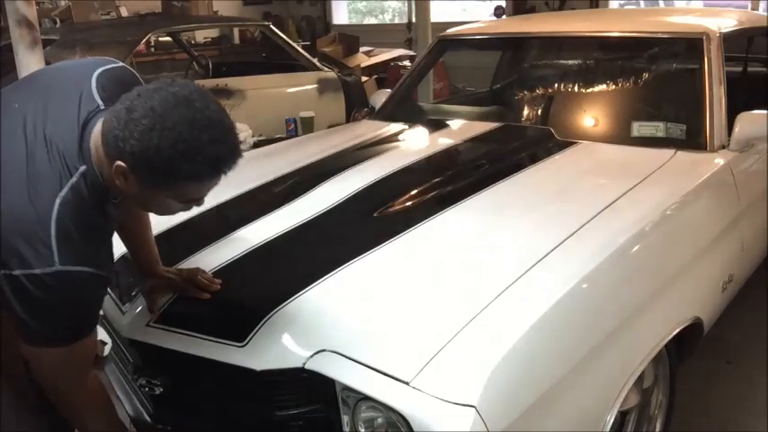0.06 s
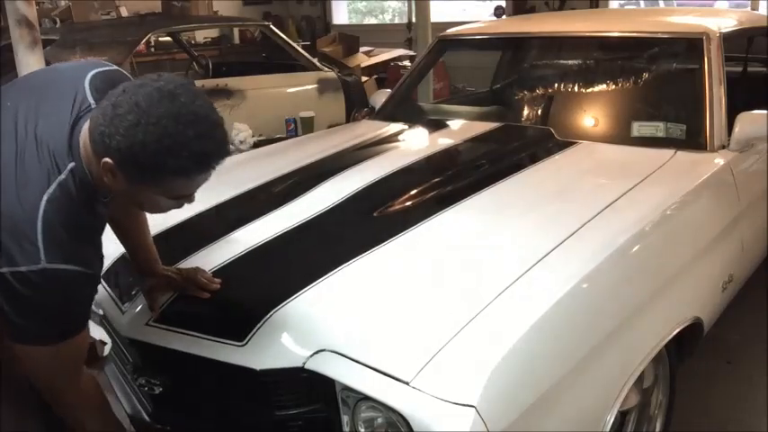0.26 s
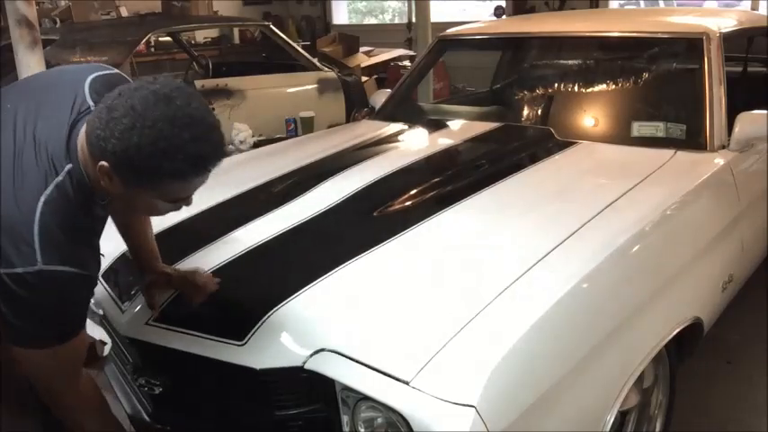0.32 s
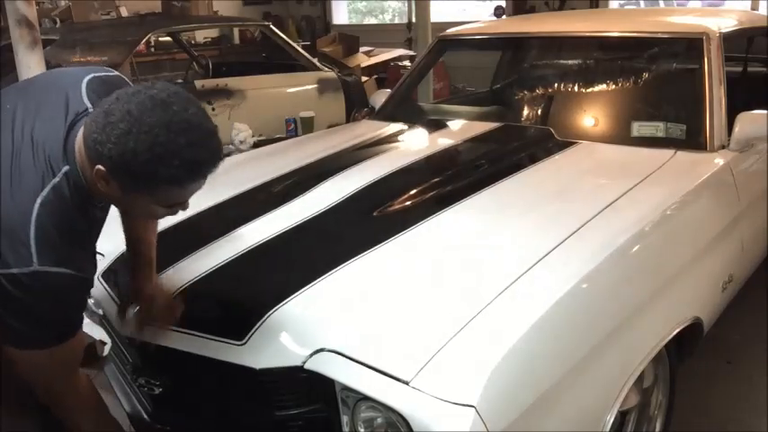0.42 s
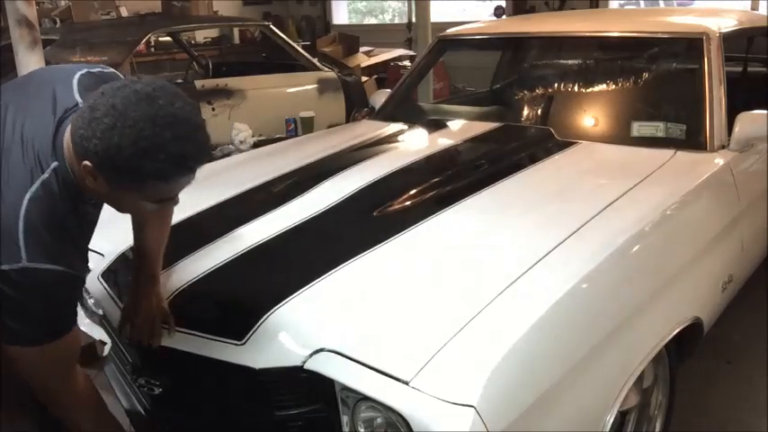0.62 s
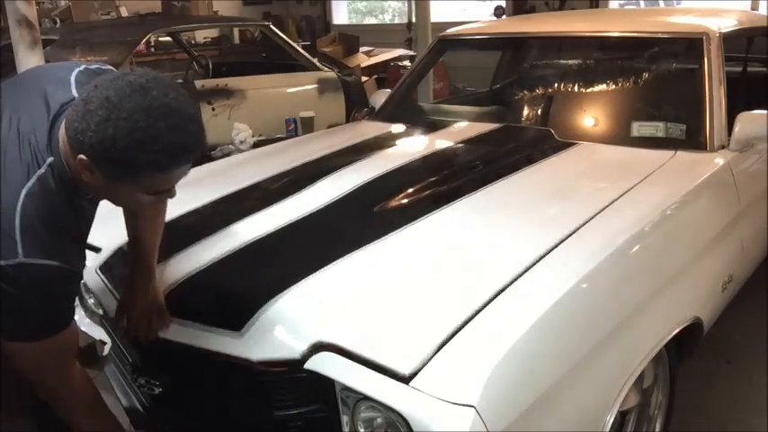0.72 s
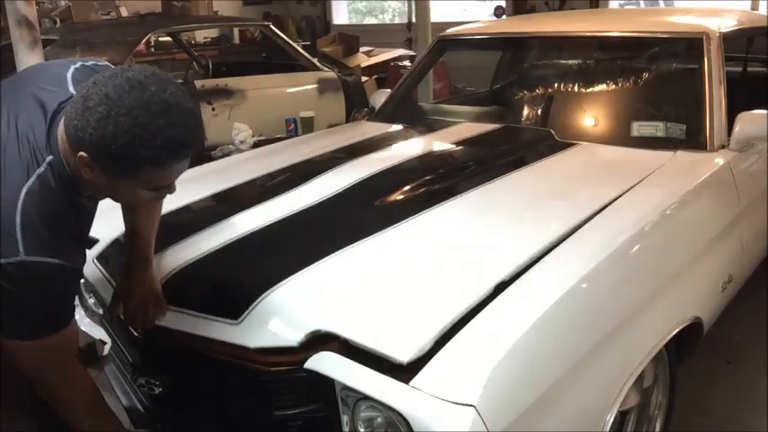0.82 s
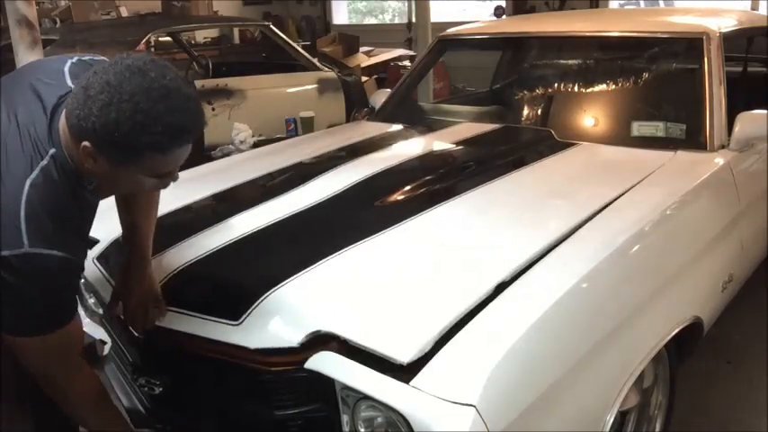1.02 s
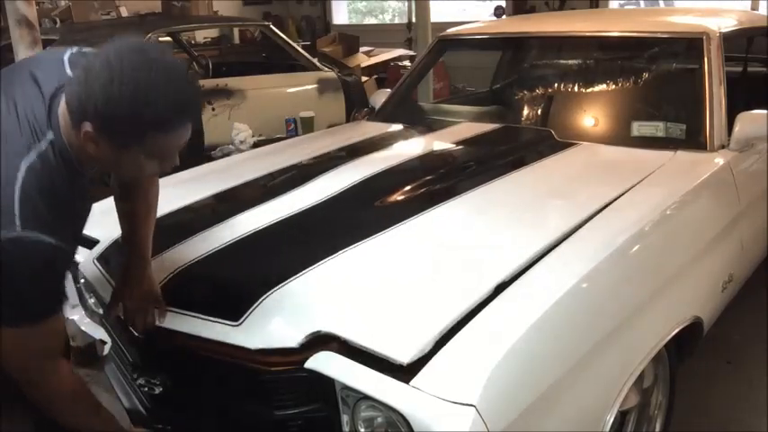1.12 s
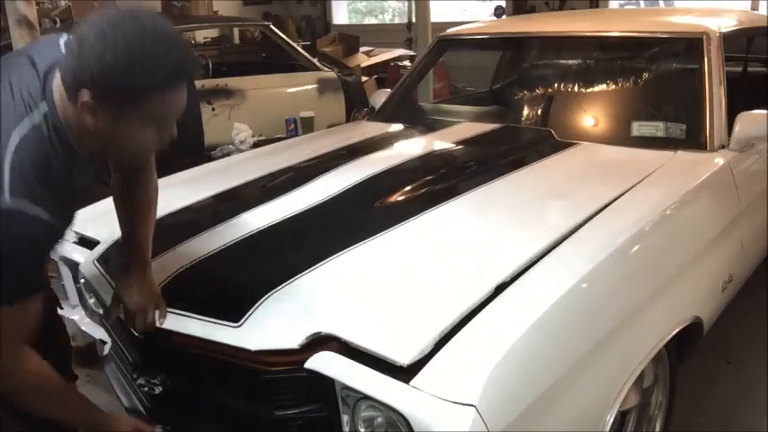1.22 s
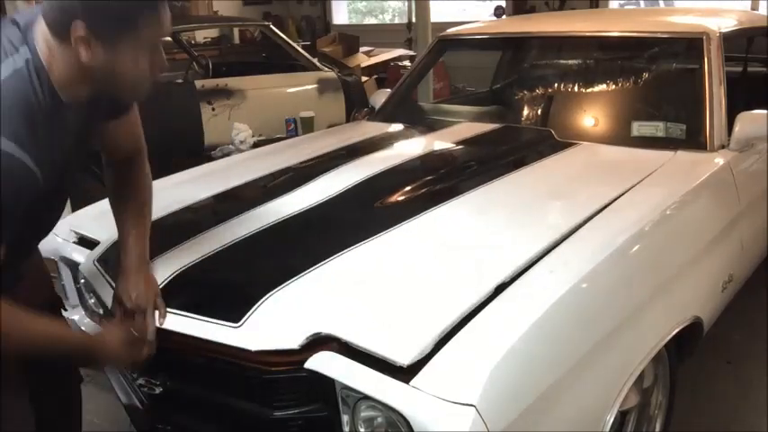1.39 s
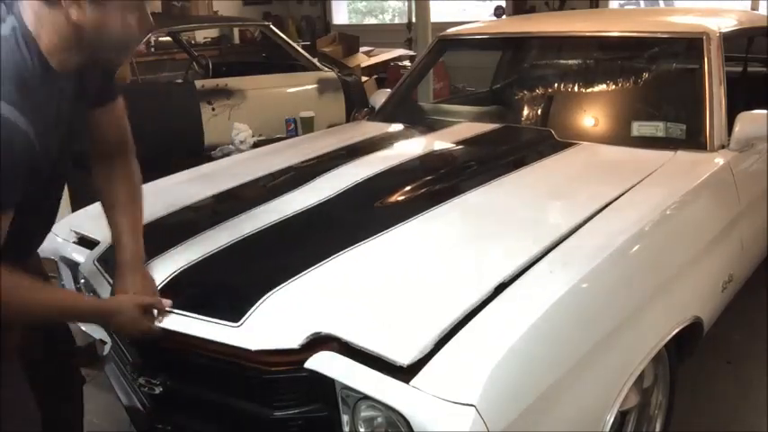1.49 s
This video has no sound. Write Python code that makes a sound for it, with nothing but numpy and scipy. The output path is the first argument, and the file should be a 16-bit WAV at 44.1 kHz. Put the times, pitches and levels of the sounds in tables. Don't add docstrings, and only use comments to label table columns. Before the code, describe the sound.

A car hood latch squeals briefly and snaps open with a loud metal clunk, the panel booming; after a quiet gap come a dull thud, light clicks and a sharp clank, close microphone in a quiet garage.

```python
import sys
import numpy as np
from scipy import signal
from scipy.fft import rfft, irfft, next_fast_len
from scipy.io import wavfile
from scipy.ndimage import map_coordinates

SR = 44100
rng = np.random.default_rng(int(sys.argv[2]) if len(sys.argv) > 2 else 0)


def rack_gain(trim_db):
    fader = np.asarray(trim_db, float)
    return 10 ** (fader / 20)


def transcribe(signal):
    frames = np.atleast_2d(signal).T
    limited = np.clip(frames, -1, 1)
    pcm = np.round(limited * 32767).astype(np.int16)
    wavfile.write(sys.argv[1], SR, pcm)


N = 68355


def unit(x):
    return x / np.sqrt(np.mean(x ** 2) + 1e-20)


def along(points, hz):
    point_hz, value = np.transpose(points)
    return np.interp(np.log(hz + 1), np.log(point_hz + 1), value)


def coloured(x, points):
    m = 2 * next_fast_len(len(x) // 2 + SR // 10)
    gain = rack_gain(along(points, np.fft.rfftfreq(m, 1 / SR)))
    cepstrum = irfft(np.log(gain + 1e-5), m)
    cepstrum[1:m // 2] *= 2
    cepstrum[m // 2 + 1:] = 0
    return irfft(rfft(x, m) * np.exp(rfft(cepstrum)), m)[:len(x)]


def evened(x):
    hz = np.fft.rfftfreq(len(x), 1 / SR)
    centre_hz = np.geomspace(50, 20000, 36)
    near = np.exp(-(np.log((hz + 1) / centre_hz[:, None]) / .12) ** 2)
    power = near @ abs(rfft(x)) ** 2 / near.sum(axis=1)
    return coloured(x, np.c_[centre_hz, -10 * np.log10(power)])


def tail(decays, scale, size):
    hz, t, z = signal.stft(rng.standard_normal(size), SR, nperseg=128)
    z = z * rack_gain(-60 * t / (scale * along(decays, hz)[:, None]))
    x = signal.istft(z, SR, nperseg=128)[1][:size]
    return x / np.linalg.norm(x)


def swell(t, rise_s, t60_s):
    rise = np.sin(np.pi / 2 * np.clip(t / rise_s, 0, 1)) ** 2
    return rise * rack_gain(-60 * np.maximum(t - rise_s, 0) / t60_s)


def add(out, x, start_s):
    part = out[round(start_s * SR):][:len(x)]
    part += x[:len(part)]


def floor():
    # frequency in Hz, level in dB per Hz.
    hiss_tone = [(25, -22), (60, 1), (170, -8), (250, -5), (640, -4), (1250, -7), (3000, -13), (7000, -17),
                 (16000, -25)]
    # frequency in Hz, level in dB.
    hum_tones = [(62, -83), (320, -80), (638, -83), (1275, -90)]
    t = np.arange(N) / SR
    out = rack_gain(-70) * unit(coloured(rng.standard_normal(N), hiss_tone))
    for hz, db in hum_tones:
        wander_db = 3.5 * map_coordinates(rng.standard_normal(size=30), [t * 9])
        out += rack_gain(db + 3 + wander_db) * np.sin(2 * np.pi * hz * t)
    return out


def contact(out, event, tone, modes=(), ring_db=0):
    # frequency in Hz, t60 in s.
    sheet = [(150, .45), (400, .36), (1000, .3), (2500, .28), (6000, .25), (15000, .2)]
    # frequency in Hz, gain in dB.
    crack = [(300, -20), (1500, -10), (4000, 0), (15000, 2)]
    impacts_per_s, early_scale, phase_walk_rad = 1800, .12, .013
    start_s, db, rise_s, fall_s, t60_scale = event
    t = np.arange(SR // 2) / SR

    impact = rng.random(len(t)) < impacts_per_s / SR
    size = rng.standard_normal(len(t))
    chatter = (.25 + impact * 2.5) * size * swell(t, rise_s, 7 * fall_s)
    body = tail(sheet, t60_scale, len(t)) + coloured(tail(sheet, early_scale, len(t)), crack)
    sound = coloured(evened(signal.fftconvolve(chatter, body)[:len(t)]), tone)
    sound = sound / np.linalg.norm(sound)
    if modes:
        ring = np.zeros(len(t))
        for hz, mode_db, t60_s in modes:
            walk = phase_walk_rad * np.cumsum(rng.standard_normal(len(t)))
            ring += rack_gain(mode_db) * swell(t, rise_s + fall_s, t60_s) * np.sin(2 * np.pi * hz * t + walk)
        sound = sound + rack_gain(ring_db) * ring / np.linalg.norm(ring)
    add(out, rack_gain(db + 31) * sound, start_s)


def scrapes():
    # start in s, level in dB, chatter rise in s, chatter fall in s, sheet t60 scale.
    touch = (.066, -60, .012, .02, .8)
    slide = (.175, -62, .035, .015, .6)
    creep = (.215, -49, .017, .004, .4)
    reach = (1.0, -66, .025, .006, .5)
    lean = (1.215, -50, .003, .003, .7)
    # frequency in Hz, level in dB per Hz.
    touch_tone = [(50, -15), (120, 0), (500, -5), (1200, -13), (1600, -9), (2200, -22), (13200, -70)]
    scrape_tone = [(100, -20), (400, -3), (2000, 0), (5300, -5), (8000, -8), (9500, -22), (15500, -30)]
    out = np.zeros(N)
    contact(out, touch, touch_tone)
    for event in (slide, creep, reach, lean):
        contact(out, event, scrape_tone)
    return out


def panel_booms():
    # start in s, frequency in Hz, level in dB, swell in s, t60 in s.
    booms = [(.073, 75, -53, .018, .27), (.11, 136, -66, .02, .4), (.235, 70, -53, .015, .5),
             (.25, 172, -52, .03, .4), (.37, 320, -59, .03, .25), (.44, 318, -64, .02, .2),
             (.485, 335, -58, .012, .07), (.232, 490, -47, .015, .2), (.24, 235, -51, .015, .2),
             (.275, 680, -48, .012, .15), (.33, 165, -55, .02, .25), (.44, 600, -66, .008, .1),
             (.8, 72, -47, .045, .35), (.83, 146, -50, .03, .3), (.845, 281, -45, .03, .2),
             (.92, 285, -56, .03, .35), (.87, 150, -50, .025, .3), (.8, 200, -55, .02, .2),
             (1.095, 220, -62, .02, .15), (1.095, 420, -56, .015, .15), (1.18, 250, -50, .02, .2),
             (1.265, 160, -52, .02, .2), (1.35, 180, -58, .02, .15), (1.38, 275, -67, .03, .3),
             (.98, 130, -60, .03, .3), (1.01, 60, -59, .02, .2), (.82, 325, -51, .03, .25),
             (.81, 450, -53, .03, .2), (.92, 72, -54, .03, .3), (1.04, 72, -58, .03, .3),
             (1.178, 390, -43, .022, .2), (1.19, 60, -49, .04, .35), (1.2, 272, -48, .04, .4),
             (1.22, 410, -48, .015, .2), (1.23, 130, -52, .03, .4), (1.31, 152, -53, .02, .25),
             (1.365, 61, -50, .02, .3), (1.29, 350, -56, .03, .2), (1.51, 65, -63, .02, .3)]
    drift_rad, gain_db = .6, 2.5
    out, t = np.zeros(N), np.arange(SR // 2) / SR
    for start_s, hz, db, rise_s, t60_s in booms:
        drift = drift_rad * map_coordinates(rng.standard_normal(size=40), [t * 45])
        boom = swell(t, rise_s, t60_s) * np.sin(2 * np.pi * hz * t + drift)
        add(out, rack_gain(db + gain_db) * boom, start_s)
    return out


def garage(hood):
    # frequency in Hz, t60 in s.
    room_decay = [(80, 1.3), (500, 1.1), (2000, .8), (6000, .45), (15000, .3)]
    level_db, delay_s = -27, .02
    delayed = np.pad(hood, (round(delay_s * SR), 0))
    return rack_gain(level_db) * signal.fftconvolve(delayed, tail(room_decay, 1, SR))[:N]


def panel_flexes():
    # start in s, level in dB, chatter rise in s, chatter fall in s, sheet t60 scale.
    press = (.13, -63, .05, .03, .6)
    shift = (.4, -63, .05, .03, .6)
    settle = (.79, -46, .06, .022, .85)
    lift = (.96, -60, .05, .05, .7)
    heave = (1.17, -42.5, .04, .035, .7)
    # frequency in Hz, level in dB per Hz.
    panel_tone = [(35, -28), (70, -3), (150, -3), (300, 0), (450, -3), (650, -9), (1200, -16), (3000, -36),
                  (15500, -80)]
    out = np.zeros(N)
    for event in (press, shift, settle, lift, heave):
        contact(out, event, panel_tone)
    return out


def squeal():
    # start in s, rise in s, level in dB, t60 in s.
    squeal_event = (.221, .015, -35, .05)
    # frequency in Hz, level in dB.
    squeal_parts = [(2530, 0), (4200, -8), (5350, -4), (7920, -10)]
    start_s, rise_s, db, t60_s = squeal_event
    out, t = np.zeros(N), np.arange(SR // 10) / SR
    walk = .02 * np.cumsum(rng.standard_normal(len(t)))
    voice = sum(rack_gain(part_db) * np.sin(2 * np.pi * hz * t + walk) for hz, part_db in squeal_parts)
    add(out, rack_gain(db) * voice * swell(t, rise_s, t60_s) * np.clip(t / rise_s, 0, 1), start_s)
    return out


def latch_hits():
    # start in s, level in dB, chatter rise in s, chatter fall in s, sheet t60 scale.
    snap = (.2295, -29.4, .006, .009, 1.13)
    rebound = (.255, -37, .012, .008, .95)
    stop = (.821, -48.5, .007, .008, .85)
    click = (1.023, -46.5, .013, .004, .55)
    hook = (1.098, -40, .007, .005, 1.05)
    clank = (1.171, -32.5, .003, .005, 1.05)
    # frequency in Hz, level in dB per Hz.
    snap_tone = [(40, -24), (150, -11), (420, -2), (570, -8), (1500, -3), (2400, -7), (3600, -14),
                 (8000, -14), (15500, -26)]
    stop_tone = [(300, -14), (700, -4), (1000, -1), (2200, 0), (3500, -8), (5200, -15), (6000, -30),
                 (15500, -40)]
    click_tone = [(350, -40), (850, -10), (1600, -5), (2500, -6), (3900, -12), (6400, -15), (7500, -29),
                  (14000, -43)]
    hook_tone = [(100, -19), (300, -18), (850, -11), (2040, -3), (2800, -13), (4800, -19), (6000, -28),
                 (15500, -41)]
    clank_tone = [(200, -45), (700, -15), (1100, -4), (1700, -5), (2430, -7), (6500, -10), (7600, -15),
                  (15500, -28)]
    # frequency in Hz, level in dB, t60 in s.
    snap_modes = [(425, -6, .2), (957, 0, .12), (1023, -3, .2), (1077, -3, .2), (1210, -6, .15),
                  (1570, -5, .15), (2003, -11, .2), (2525, -1, .08), (3047, -10, .15), (6433, -16, .2)]
    stop_modes = [(678, -6, .2), (960, -2, .1), (2144, 0, .05), (2745, -7, .08), (5000, -11, .04)]
    click_modes = [(870, -16, .15), (1453, -10, .17), (1663, 0, .11), (2430, -4, .08), (2584, -8, .1),
                   (3375, -5, .15), (4210, -11, .03), (5593, -10, .03), (6500, -10, .04)]
    hook_modes = [(861, -12, .25), (1374, -1, .1), (1642, -8, .2), (1976, -9, .2), (2079, 0, .05),
                  (2476, -14, .2), (4382, -7, .04)]
    clank_modes = [(1596, -3, .12), (1717, -2, .12), (1879, -5, .12), (2890, -4, .08), (3600, -4, .05),
                   (5529, -9, .1), (6500, -2, .06), (6745, -12, .2), (8796, -12, .1)]
    ring_levels = [-7, -5, 0, -3, -10]
    out = np.zeros(N)
    contact(out, snap, snap_tone, snap_modes, ring_levels[0])
    contact(out, rebound, hook_tone)
    contact(out, stop, stop_tone, stop_modes, ring_levels[1])
    contact(out, click, click_tone, click_modes, ring_levels[2])
    contact(out, hook, hook_tone, hook_modes, ring_levels[3])
    contact(out, clank, clank_tone, clank_modes, ring_levels[4])
    return out


def knocks():
    # start in s, frequency in Hz, level in dB, t60 in s.
    loose_parts = [(.233, 2500, -28, .03), (.2365, 1100, -30, .03), (.2405, 2560, -27, .035),
                   (.241, 1200, -31, .02), (.238, 5300, -33, .02), (.246, 3600, -33, .03),
                   (.25, 1300, -28, .03), (.2505, 2400, -31, .025), (.254, 1150, -30, .025),
                   (.262, 1500, -31, .03), (.2655, 1800, -32, .025), (.265, 960, -28, .05),
                   (.274, 2000, -32, .06), (.282, 3000, -38, .025), (.286, 950, -33, .03),
                   (.3, 2300, -38, .03), (.828, 2100, -46, .03), (.833, 970, -44, .04),
                   (1.037, 1663, -43, .08), (1.039, 3480, -49, .08), (1.104, 2080, -35, .05),
                   (1.172, 6500, -31, .015), (1.174, 1900, -30, .02), (1.176, 3500, -29, .02),
                   (1.178, 6500, -29, .015), (1.1775, 1800, -31, .012), (1.184, 1800, -32, .03),
                   (1.19, 1500, -33, .03), (1.198, 1800, -30, .02), (1.208, 6300, -40, .03),
                   (1.213, 6600, -41, .02), (1.2175, 9000, -43, .012), (1.216, 1500, -38, .02),
                   (1.224, 1900, -38, .03), (1.104, 1450, -37, .05)]
    rise_s, gain_db, phase_walk_rad = .002, -1.5, .013
    out, t = np.zeros(N), np.arange(SR // 8) / SR
    for start_s, hz, db, t60_s in loose_parts:
        walk = phase_walk_rad * np.cumsum(rng.standard_normal(len(t)))
        knock = swell(t, rise_s, t60_s) * np.sin(2 * np.pi * hz * t + walk)
        add(out, rack_gain(db + gain_db) * knock, start_s)
    return out


def sag():
    # start in s, from Hz, to Hz, glide in s, level in dB, swell in s, t60 in s.
    sag_event = (.275, 400, 305, .065, -46, .02, .33)
    start_s, from_hz, to_hz, glide_s, db, rise_s, t60_s = sag_event
    out, t = np.zeros(N), np.arange(SR // 2) / SR
    pitch_hz = from_hz + (to_hz - from_hz) * np.clip(t / glide_s, 0, 1)
    add(out, rack_gain(db) * swell(t, rise_s, t60_s) * np.sin(2 * np.pi * np.cumsum(pitch_hz) / SR), start_s)
    return out


def scene():
    hood = scrapes() + panel_booms() + panel_flexes() + squeal() + latch_hits() + knocks() + sag()
    return (hood + garage(hood) + floor())[None]


def roll_off(x):
    return signal.sosfilt(signal.butter(12, 16150, fs=SR, output="sos"), x)


def record(dry):
    top_hz = 15850
    m = next_fast_len(N + SR // 10)
    passed = np.fft.rfftfreq(m, 1 / SR) < top_hz
    mix = irfft(rfft(dry, m) * passed, m)[..., :N]
    return roll_off(mix)


dry = scene()
out = record(dry)
transcribe(out)
```